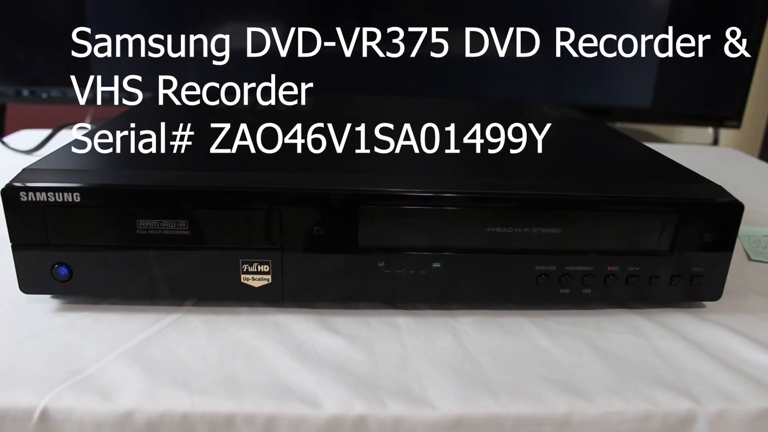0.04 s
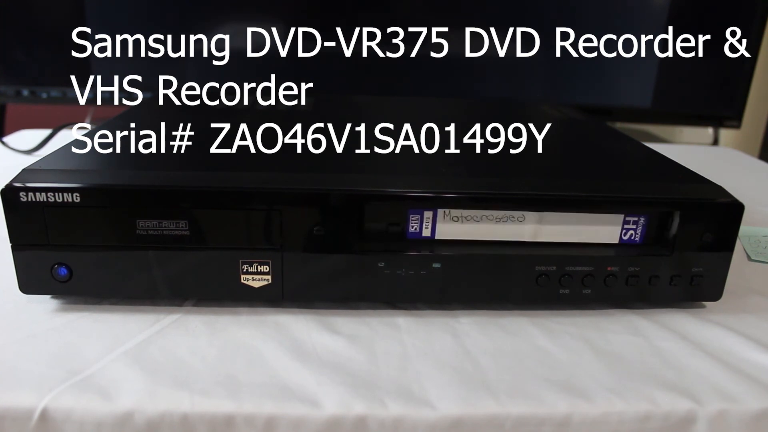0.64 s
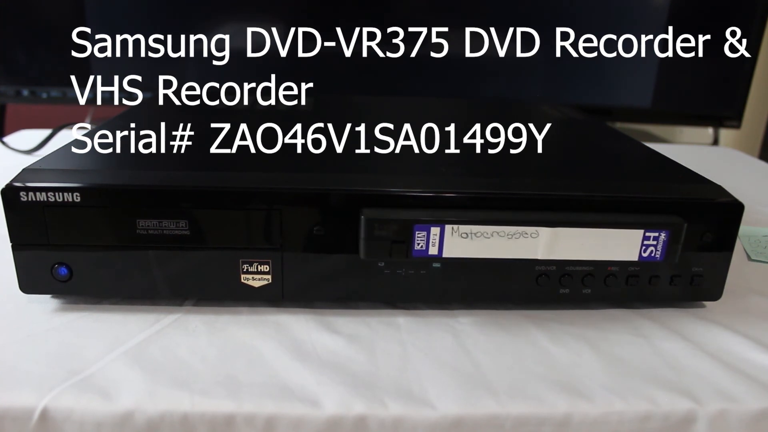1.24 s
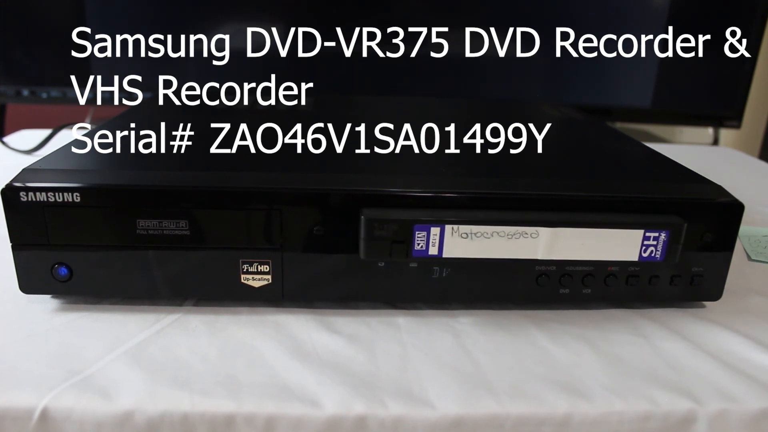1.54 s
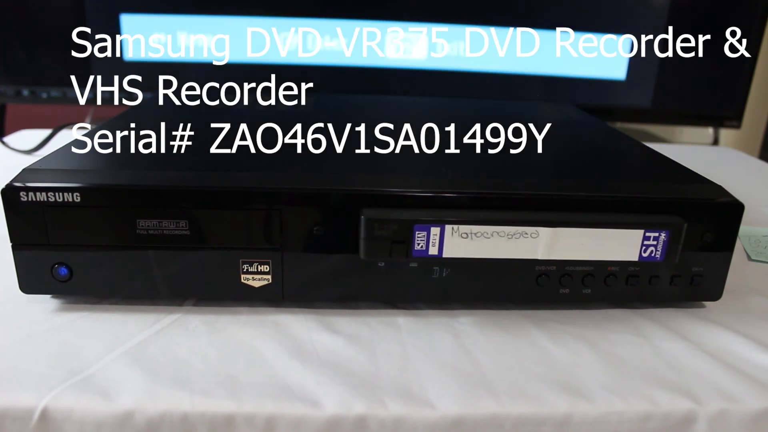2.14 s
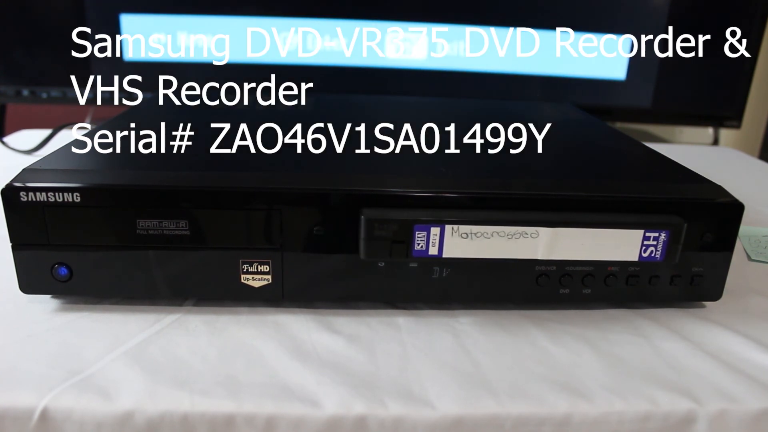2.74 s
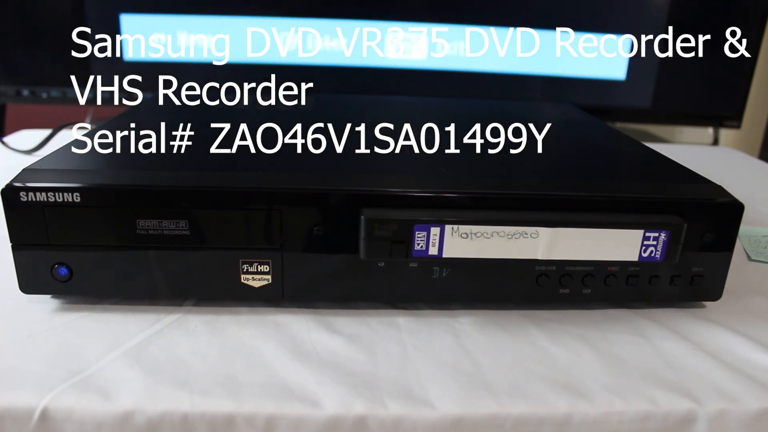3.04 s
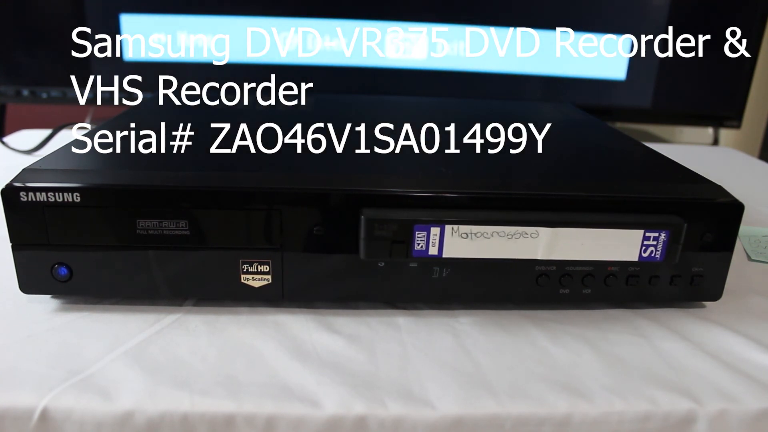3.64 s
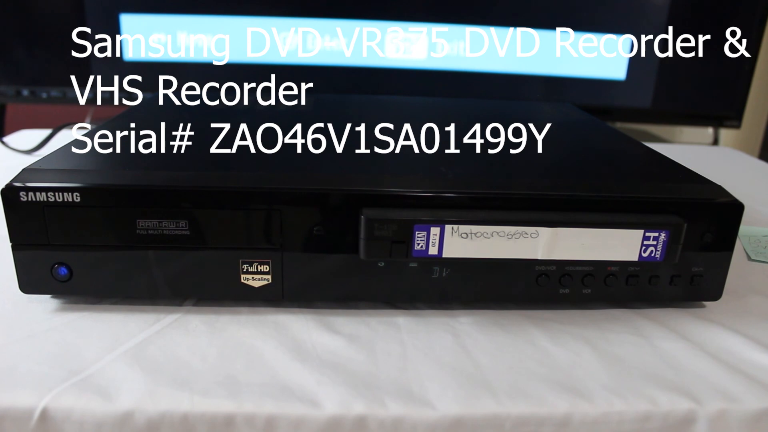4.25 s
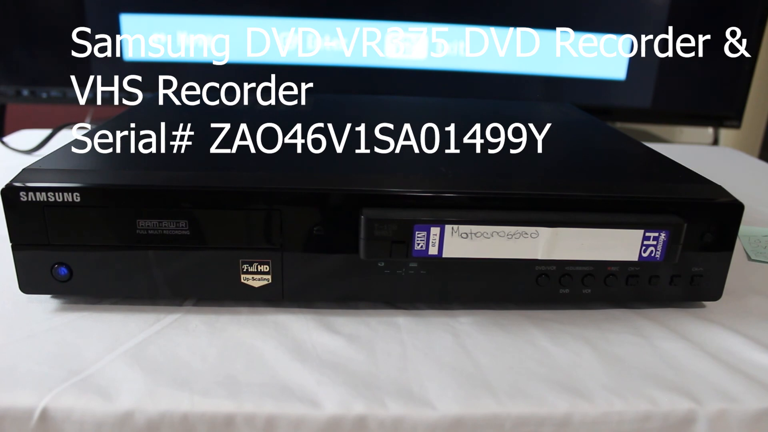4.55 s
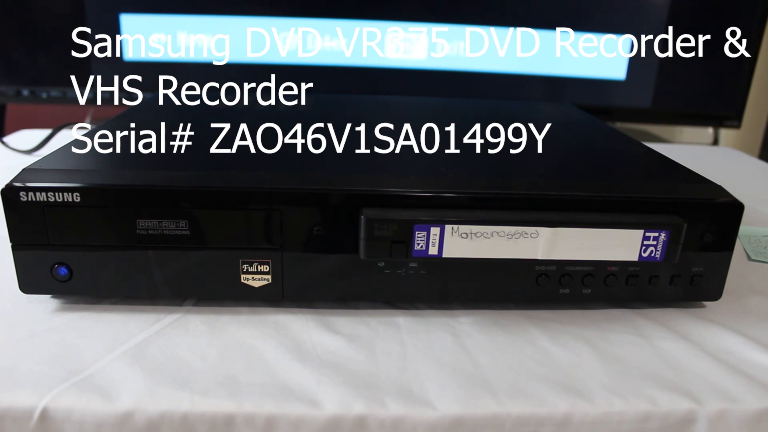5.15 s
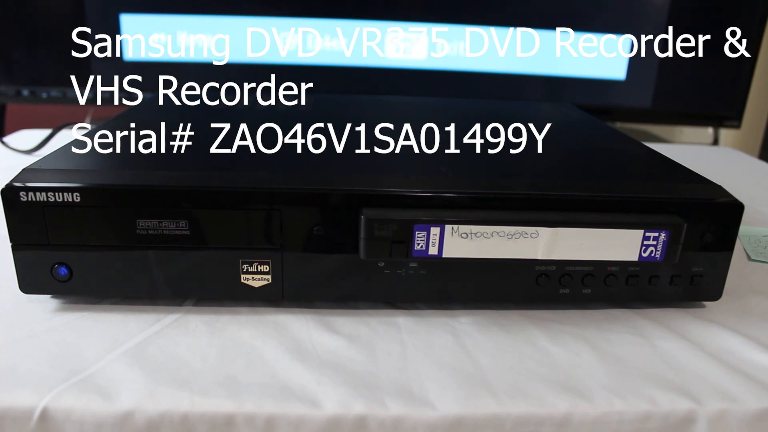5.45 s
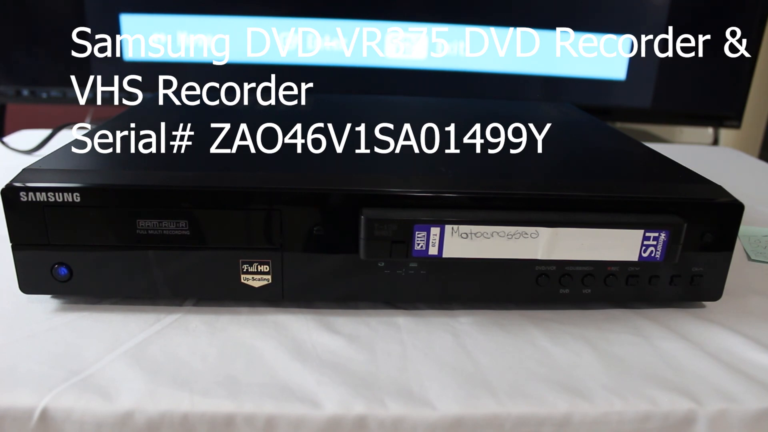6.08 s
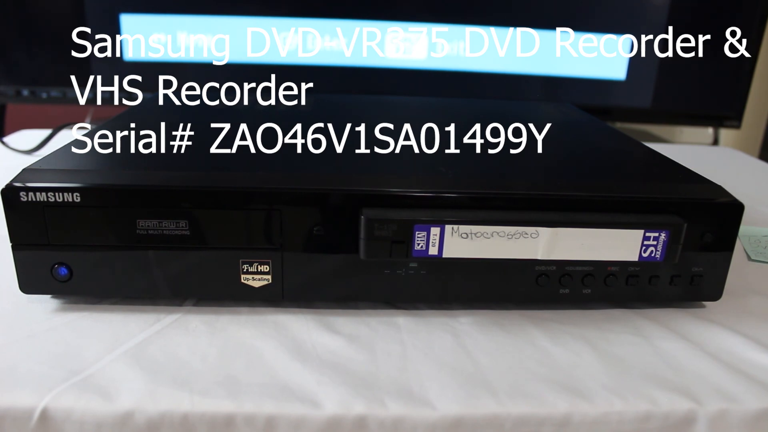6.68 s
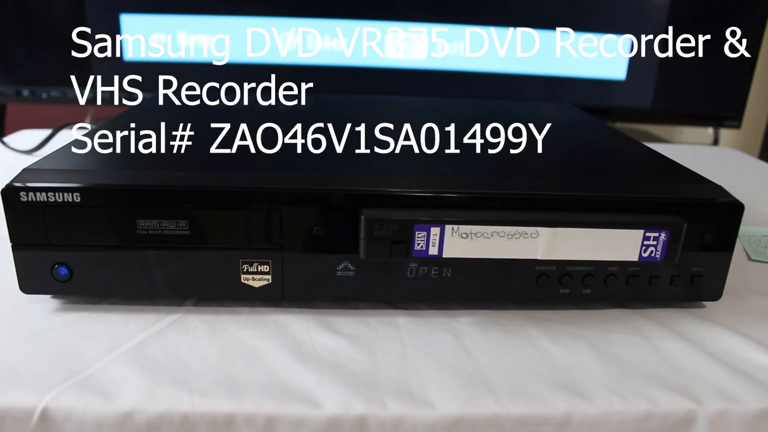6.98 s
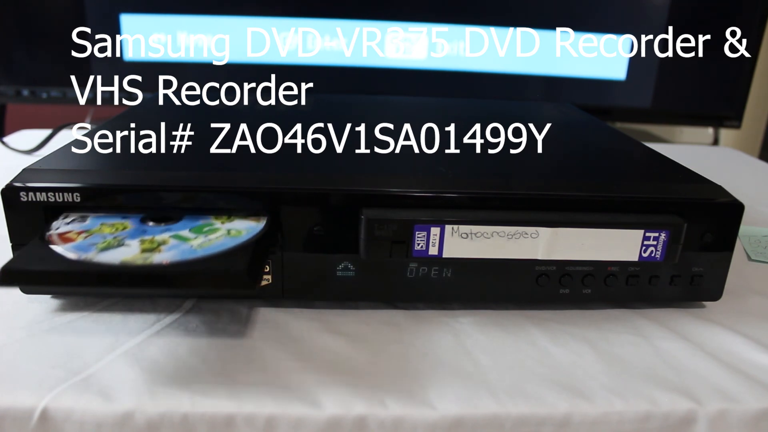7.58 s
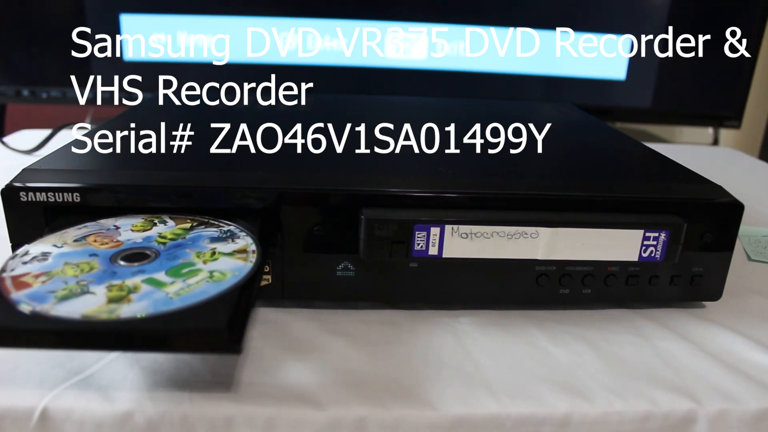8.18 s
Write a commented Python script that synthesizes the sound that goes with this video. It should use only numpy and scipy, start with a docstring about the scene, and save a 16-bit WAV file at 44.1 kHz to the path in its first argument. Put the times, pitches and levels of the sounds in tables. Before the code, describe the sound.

Close up in a quiet room, a tape and disc player ejects a cassette with chattering gears and a burst of plastic clacks. A soft whir with a thin whine runs on, then stops, and a duller rush swells and fades as a disc spins. The drive gives two short buzzes a few seconds apart. Finally a button ticks and the tray clacks loose, grinds out and knocks against its stop, over a faint hum.

```python
"""A quiet, furnished room; a stereo microphone stands close in front of a tape and disc player on a table.
The cassette carriage rattles up and drops the tape at the slot while the head drum whirs on. The drum's
whine stops; a duller rush of air swells and fades as the disc spins up. The disc drive's stepper runs its
sled out and, three seconds later, back. Then the tray unlatches, grinds out on its plastic gears and hits
its stop. The mains transformer hums throughout."""
import sys
import numpy as np
from scipy import signal
from scipy.fft import rfft, irfft, next_fast_len
from scipy.io import wavfile
from scipy.ndimage import uniform_filter1d

SR = 44100
rng = np.random.default_rng(int(sys.argv[2]) if len(sys.argv) > 2 else 0)


def pcm_store(signal):
    """Save signal as 16-bit PCM."""
    levels = np.round(np.clip(np.atleast_2d(signal), -1, 1) * 32767)
    wavfile.write(sys.argv[1], SR, levels.astype(np.int16).T)


N = 366912
TIME = np.arange(N) / SR


def undb(db):
    """Decibels to gain."""
    return 10 ** (np.asarray(db) / 20)


def unit(x):
    """Scale to rms 1."""
    return x / np.sqrt(np.mean(x ** 2) + 1e-20)


def noise(size=N):
    """White noise."""
    return rng.standard_normal(size)


def gate(start, end, rise, fall):
    """Opens at start and dies away after end; rise and fall are time constants in seconds."""
    return (1 - np.exp(-np.maximum(TIME - start, 0) / rise)) * np.exp(-np.maximum(TIME - end, 0) / fall)


def ramp(start, end, db_per_s):
    """Gain that changes at a steady rate between two times."""
    return undb(db_per_s * (np.clip(TIME, start, end) - start))


def walk(rate):
    """Smooth random drift with a spread near 1, drawn anew rate times a second."""
    step = max(int(SR / rate), 2)
    points = noise(N // step + 2)
    drift = np.interp(np.arange(N) / step, np.arange(len(points)), points)
    return 1.25 * uniform_filter1d(drift, step // 2 + 1)


def colour(x, points):
    """Minimum-phase filter through (Hz, dB) points: nothing sounds ahead of a blow."""
    size = next_fast_len(len(x) + 2048, True)
    hz, db = np.transpose(points)
    gain = undb(np.interp(np.log(np.fft.rfftfreq(4096, 1 / SR) + 1), np.log(hz), db))
    cepstrum = irfft(np.log(gain))
    cepstrum[1:2048] *= 2
    cepstrum[2049:] = 0
    impulse = irfft(np.exp(rfft(cepstrum)))
    return irfft(rfft(x, size) * rfft(impulse, size), size)[:len(x)]


def resonate(x, hz, width_hz):
    """Two-pole resonance, gain 1 at the centre."""
    return signal.lfilter(*signal.iirpeak(hz, hz / width_hz, fs=SR), x)


def steep_mode(x, hz, width_hz):
    """Two resonances in series, each twice the nominal width: one peak with steep skirts."""
    return resonate(resonate(x, hz, 2 * width_hz), hz, 2 * width_hz)


def turns(hz):
    """Cycles counted at a moving frequency, from a random phase."""
    return np.cumsum(hz * np.ones(N)) / SR + rng.random()


def tones(rows, speed, flutter_db, rate):
    """Sines that follow one shaft speed and flutter in level on their own."""
    shaft = turns(speed)
    return sum(np.sqrt(2) * undb(db + flutter_db * walk(rate)) * np.sin(2 * np.pi * hz * shaft)
               for hz, db in rows)


def teeth(hz, scatter_db, click):
    """Each gear tooth lands with a small click and slides off; scatter_db varies their loudness."""
    phase = turns(hz)
    tooth = phase.astype(int)
    force = undb(scatter_db * noise(N // 50))[tooth]
    sliding = unit(force * noise() * np.exp(-2 * (phase % 1)))
    landing = unit(force * np.diff(tooth, prepend=tooth[0]))
    return sliding + click * landing


def place(track, start, blow, db):
    """Mix a blow in at start seconds, its first 10 ms brought to db."""
    i = int(start * SR)
    track[i:i + len(blow)] += blow[:N - i] * undb(db) / np.std(blow[:SR // 100])


def pair(make, spread):
    """Diffuse sound at the microphone's two ports; spread gives side against mid as (Hz, dB) points."""
    mid, side = make(), colour(make(), spread)
    return np.array([mid + side, mid - side])


# Air and rumble all around the microphone. Each row: frequency in Hz, relative level in dB.
AIR_COLOUR = [(88, -40.5), (150, -10.5), (239, -8), (268, -7.5), (290, -11.5), (373, -11), (481, -14),
              (618, -15), (668, -16.5), (1200, -16.5), (2410, -23), (4750, -26.5), (15500, -39)]
RUMBLE_COLOUR = [(20, -26.5), (40, -21.5), (55, -16), (70, -7.5), (82, -16), (98, -4), (122, -13),
                 (145, -13), (220, -36.5), (400, -59.5)]
# The transformer, dead centre. Each row: frequency in Hz, rms level in dB.
MAINS_HUM = [(120, -53.5), (240, -64.5)]


def background(air_db=-57.0, rumble_db=-56):
    """Room air and hiss, a low rumble and the transformer's hum."""
    air = pair(lambda: unit(colour(noise(), AIR_COLOUR)), [(200, -1), (1500, 2), (4000, 3.5), (8000, 1.5)])
    rumble = pair(lambda: unit(colour(noise(), RUMBLE_COLOUR)), [(30, -13.5), (70, -8.5)])
    return undb(air_db) * air + undb(rumble_db) * rumble + tones(MAINS_HUM, 1, flutter_db=2.0, rate=5)


def room(x, wet_db=-9, low_t60=0.58, mid_t60=0.46, high_t60=0.26):
    """The walls of a small furnished room answer the player; the bass rings longest."""
    t = np.arange(int(SR * .8)) / SR
    bands = ((180, 880, low_t60, 0.62), (780, 3200, mid_t60, 0.42), (3000, 20000, high_t60, 0.51))

    def tail():
        wash = 0
        for low_hz, high_hz, t60, share in bands:
            band = signal.butter(2, (low_hz, high_hz), "band", fs=SR, output="sos")
            wash += share * signal.sosfilt(band, noise(len(t))) * undb(-60 * t / t60)
        wash *= 1 - np.exp(-t / 0.004)
        return wash / np.sqrt(np.mean(np.abs(rfft(wash)[200:2400]) ** 2))  # gain 1 over 250-3000 Hz
    response = pair(tail, [(200, -15.5), (1500, -7.5), (4000, -4), (8000, 3.5)])
    return undb(wet_db) * signal.fftconvolve(x[None], response, axes=1)[:, :N]


# The braking disc, faint inside the case. Each row: frequency in Hz, nominal width in Hz, relative dB.
SQUEAL_MODES = [(1390, 510, -8), (2110, 59, 2), (3170, 170, -6.5), (3650, 120, 0)]


def spindle(whir_db=-58, squeal_db=-58.5, scuff_hz=28, scuff_db=3):
    """The disc motor's falling whir swells and fades; later the disc scuffs once a turn as it brakes."""
    phase = 2 * np.pi * turns(np.interp(TIME, [3.9, 4.2], [625, 580]))
    whir = walk(190) * np.sin(phase) + walk(190) * np.cos(phase)  # a narrow band of noise
    swell = undb(whir_db) * np.exp(-((TIME - 4.04) / 0.16) ** 2)
    start, stop = 5.595, 5.812
    rub = noise() * undb(1.1 * walk(90) - scuff_db * np.sin(2 * np.pi * scuff_hz * (TIME - start)))
    squeal = unit(sum(undb(db) * steep_mode(rub, hz, width) for hz, width, db in SQUEAL_MODES))
    braking = undb(squeal_db) * gate(start, stop, .012, 0.013) * ramp(start, stop, db_per_s=29)
    return whir * swell + squeal * braking


DRUM_OFF_S = 3.11
# The rush of stirred air and the drum motor's whine, heard through the case.
# Each row: frequency in Hz, relative level in dB.
RUSH_COLOUR = [(120, -49), (200, -7.5), (231, -3), (267, -17), (405, 2), (459, -8), (540, -5), (696, -10.5),
               (1430, -6.5), (1980, -13.5), (3540, -11), (4470, -29.5), (6300, -21), (7150, -23.5),
               (15000, -35)]
DRUM_WHINE = [(398.4, -71), (2471, -71.5), (3738, -77), (5410, -80), (5475, -80), (6142, -89), (6207, -74),
              (6277, -80), (6342, -80), (6412, -76), (7747, -89.5), (7876, -77), (8479, -73), (8613, -91),
              (9615, -88), (10880, -79.5), (11348, -85), (11816, -89)]


def drum_and_disc_air(drum_db=-54, spin_up_db=-48.5, whine_db=-1, spin_up_end_s=4.08):
    """The head drum's whir and whine stop; a duller rush of air swells and fades as the disc spins up."""
    air = unit(colour(noise() * undb(1.6 * walk(60)), RUSH_COLOUR))
    dull_air = colour(air, [(1200, -3.0), (3500, -5.0), (6000, -8)])
    powered = gate(-1, DRUM_OFF_S, .01, 0.026)
    running = undb(drum_db) * powered * ramp(0, DRUM_OFF_S, db_per_s=-1.06)
    spin_up = undb(spin_up_db) * gate(DRUM_OFF_S, spin_up_end_s, 0.065, 0.3)
    spin_up *= ramp(DRUM_OFF_S, spin_up_end_s, db_per_s=-9)
    speed = 1 + 0.00033 * walk(5) + .001 * walk(70)
    whine = tones(DRUM_WHINE, speed, flutter_db=1.5, rate=13)
    return air * running + dull_air * spin_up + undb(whine_db) * whine * powered


# A button, close to the microphone. Each row: start in seconds, level in dB.
BUTTON_TICKS = [(1.5662, -46.5), (6.8403, -41)]


def button(t60=0.047):
    """A button gives a short dry tick, narrow and bright."""
    out, t = np.zeros(N), np.arange(SR // 8) / SR
    shape = [(700, -16), (2000, -14), (3000, -4.5), (4100, -6.0), (4900, -35), (10000, -44)]
    for start, db in BUTTON_TICKS:
        place(out, start, colour(noise(len(t)) * undb(-60 * t / t60), shape), db)
    return out


# The sled's two runs inside the disc drive. Each row: start and end in seconds, base levels of tone
# and rattle in dB, settling time in seconds, base level of the jolts in dB.
SLED_RUNS = [(3.355, 3.505, -43, -44.5, 0.02, -44.5), (6.398, 6.567, -41.5, -47.5, 0.056, -41)]
# The stepper's note going out and coming back. Each row: multiple of the step rate, relative level in dB.
HARMONICS_OUT = [(1, -2), (2, 2.5), (3, -2.5), (4, -3), (5, -3), (6, -8), (7, -13), (8, -2.5), (9, -6.5),
                 (10, -8), (12, -22), (14, -17), (15, -9), (18, -21), (19, -25)]
HARMONICS_BACK = [(1, -0.5), (2, -4), (3, -2), (4, -4), (5, 1.5), (6, -8), (7, -41), (8, -1), (9, -8),
                  (10, -12), (11, -26), (12, -25), (13, -22), (14, -14), (15, -6.5), (16, -23), (17, -14),
                  (18, -13), (19, -30), (20, -19), (21, -18), (22, -28), (23, -29), (24, -15), (25, -25),
                  (26, -29), (27, -33)]
# The lead screw's rattle. Each row: frequency in Hz, relative level in dB.
SCREW_COLOUR = [(150, -3), (250, -33), (362, -19), (621, -12), (760, -2), (930, -9), (1100, -1.5),
                (1760, -3), (1920, -19), (2020, -5), (3070, -3), (4930, -19), (5540, -15), (7020, -12),
                (9800, -17.5), (11500, -30), (14000, -37)]


def sled(step_hz=381.8, rough_db=7):
    """The stepper rattles its lead screw, locks to the step rate and sings, then rattles as it stops."""
    out = 0
    for run, harmonics in zip(SLED_RUNS, (HARMONICS_OUT, HARMONICS_BACK)):
        start, end, tone_db, rattle_db, settle, _ = run
        locked = np.interp(TIME, [start + settle / 2, start + settle, end - .022, end], [.2, .96, .97, .22])
        hz = step_hz * (1 + (.002 + .03 * (1 - locked)) * walk(300))
        phase = 2 * np.pi * turns(hz)
        tone = unit(sum(undb(db) * np.sin(k * phase + 2 * np.pi * rng.random()) for k, db in harmonics))
        rattle = unit(colour(teeth(hz, scatter_db=0.0, click=0.35), SCREW_COLOUR))
        rattle *= undb(rattle_db + rough_db * (.8 - locked) / 2)
        out += gate(start, end, 0.0012, 0.0055) * (undb(tone_db) * locked * tone + rattle)
    return out


def shudders(frame_hz=372, frame_lag_s=0.017, rattle_db=-3, jolt_s=.036, brake_lead_s=0.017):
    """Jolts shake the drive's loose parts at once and rock its frame at its resonance a moment later."""
    shake = teeth(190 * (1 + .2 * walk(80)), scatter_db=-0.5, click=0.075)
    frame = unit(resonate(resonate(shake, frame_hz, 60), frame_hz, 81))
    rattle = unit(colour(shake, [(100, 0), (200, 8.5), (700, -1.5), (1400, 5.0), (2300, -5.5),
                                 (3500, -4.5), (4600, -20.0), (7000, -18), (12000, -35)]))
    jolts = [(DRUM_OFF_S - brake_lead_s, -45)]  # seconds and dB: the drum's drive is cut
    for start, end, *_, db in SLED_RUNS:
        twitch, brake, rebound = (start - 0.074, db - 4.5), (end - brake_lead_s, db - .5), (end + .041, db - 5)
        jolts += [twitch, (start, db), brake, rebound]
    push = sum(undb(db) * gate(at, at + jolt_s, 0.0089, 0.013) for at, db in jolts)
    return undb(rattle_db) * rattle * push + frame * np.interp(TIME - frame_lag_s, TIME, push)


# The loading gears behind the cassette slot. Each row: frequency in Hz, relative level in dB.
LOADER_COLOUR = [(59, -52), (100, -9), (171, -11), (238, 1), (416, -5.5), (491, -5.5), (617, -3),
                 (993, -11.5), (1630, -9), (2220, -20), (2570, -8), (5520, -25), (14000, -48)]


def loader(tooth_hz=190, motor_db=-61, slide_db=-46.5, lift_db=-50):
    """Worm gear and racks chatter with the load: bare motor, sliding carriage, ever heavier lift."""
    mesh = teeth(tooth_hz * (1 + .15 * walk(80)), scatter_db=2.0, click=0.24)
    chatter = unit(colour(mesh * undb(2 * walk(53.84)), LOADER_COLOUR))
    motor = undb(motor_db) * gate(-1, 1.4, .01, 0.16)
    slide = undb(slide_db) * gate(0.27, 0.99, 0.11, 0.054)
    lift = undb(lift_db) * gate(0.37, 0.641, .01, 0.039) * ramp(0.37, 0.641, db_per_s=65)
    return chatter * (motor + slide + lift)


# Grind and whine of the tray's gears, close in front. Each row: frequency in Hz, relative level in dB.
GRIND_COLOUR = [(100, -33), (170, -3.5), (414, -0.5), (461, -2), (670, -2.5), (786, -5), (974, -4.5),
                (1100, 4.5), (1320, -2), (1660, -2.5), (2330, -8), (3450, -16), (4670, -22), (5680, -21),
                (12000, -38.5), (15600, -61), (22000, -120)]
GEAR_WHINE = [(360.7, -19), (409.1, -17), (802.1, -12.5), (1130, -19), (1663, -15)]
# The gear train's resonances. Each row: frequency in Hz, nominal width in Hz, relative level in dB.
GEAR_MODES = [(1130, 37, -18), (1700, 28, 0.5), (2820, 120, 1.5), (2980, 72, 2), (3410, 170, 1),
              (4040, 92, -4.5), (5730, 170, -13)]


def tray_gears(tooth_hz=268.5, wheel_hz=18, grind_db=-2.0, modes_db=-5, travel_db=-44.5, clamp_db=-45.5):
    """Plastic gears grind, ring and whine, throbbing once per turn of an off-centre wheel."""
    speed = 1 + .004 * walk(9) + .008 * walk(90)
    wheel = turns(wheel_hz * (1 + .1 * walk(4)))
    throb = undb(1.5 * np.sin(2 * np.pi * wheel) + .8 * walk(50))
    mesh = teeth(tooth_hz * speed * (1 + .06 * walk(200)), scatter_db=2.1, click=.15)
    grind = unit(colour(mesh, GRIND_COLOUR))
    # each resonance flutters as the load shifts between the gears
    ringing = unit(sum(undb(db + 2.6 * walk(45)) * steep_mode(mesh, hz, width)
                       for hz, width, db in GEAR_MODES))
    whine = tones(GEAR_WHINE, speed, flutter_db=1.5, rate=25)
    load = undb(travel_db) * gate(6.855, 8.08, 0.097, 0.038)
    load += undb(clamp_db) * gate(6.925, 7.1, 0.0079, 0.028)  # heavier while it frees the disc clamp
    return (undb(grind_db) * grind + undb(modes_db) * ringing + whine) * throb * load


def knocks(rows, shape, modes, ring_db, snap_db, snap_share,
           strike_db, strike_t60, crack_t60, case_db, case_t60, case_slope):
    """Each blow is a sharp strike, a dense plastic crack, a wash inside the case and the part's modes."""
    out, t = np.zeros(N), np.arange(SR // 2) / SR
    typical_db = np.mean([row[1] for row in rows])
    for start, db, bass, treble in rows:
        wash_db = case_db - case_slope * (db - typical_db)  # heavy blows are the driest
        strike = undb(strike_db - 60 * t / strike_t60)
        fade = strike + undb(-60 * t / crack_t60) + undb(wash_db - 60 * t / case_t60)
        crack = colour(noise(len(t)) * fade * (1 - np.exp(-t / 0.0002)), shape)
        ring = sum(undb(mode_db - 60 * t / t60) * np.sin(2 * np.pi * hz * t) * rng.choice([-1, 1])
                   for hz, mode_db, t60 in modes)
        # soft heavy contacts favour the bass, hard light ones the treble and the snap above it
        snap = snap_db + snap_share * treble
        contact = [(130, bass / 2 - 4), (330, bass), (580, bass), (1350, 0), (3800, 0),
                   (6000, treble), (8500, treble), (12000, snap), (15000, snap + 4)]
        place(out, start, colour(unit(crack) + undb(ring_db) * unit(ring), contact), db)
    return out


# The sled's starts and stop (first three rows), then clamp, latch and tray, close in front.
# Each row: start in seconds, level in dB, bass and treble in dB against the middle.
DRIVE_BLOWS = [(3.365, -45, -1, 10), (6.411, -40, -8, 9), (6.549, -42.5, -7, -10), (6.927, -36.5, -9, -12),
               (6.94, -35, -8, -4), (6.967, -32.5, -5, -2.5), (7.045, -31.5, -2.5, -11),
               (7.074, -34, 0, -7), (7.115, -17.5, -16, -8), (7.143, -30, -4, -17), (8.023, -35, 3, -1),
               (8.031, -24, -6.5, -7.5), (8.047, -32, 2, 0), (8.07, -37, 3, -6)]
# The crack of the disc drive's plastic. Each row: frequency in Hz, relative level in dB.
DRIVE_COLOUR = [(35, -46), (60, -8), (385, 4.5), (475, -1), (738, -12.5), (810, -5.5), (999, -8.5),
                (1200, -1.5), (1830, -9.5), (2250, -6), (2650, -10.5), (3420, -6), (4520, -16.5),
                (8470, -19.5), (15500, -37)]
# The tray's ring. Each row: frequency in Hz, relative level in dB, seconds to fall 60 dB.
TRAY_MODES = [(264, -16, 0.18), (350, 1, 0.29), (398, 17, 0.32), (598, 6, 0.3), (802, -67, .15),
              (948, 4, 0.26), (1180, -8, 0.11), (1260, -14, .12), (1660, -2, 0.26), (2113, 1.5, 0.14),
              (2449, -25, .17), (3240, -24, 0.18), (3530, -25, .2), (3970, 3, 0.058)]


def drive_knocks():
    """The sled knocks as it starts and brakes; then clamp and latch knock and the tray hits its stop."""
    return knocks(DRIVE_BLOWS, DRIVE_COLOUR, TRAY_MODES, ring_db=-5, snap_db=-9, snap_share=0.95,
                  strike_db=-6, strike_t60=0.043, crack_t60=0.043,
                  case_db=-6, case_t60=0.17, case_slope=1.0)


# Cassette carriage and flap, close and just right of centre.
# Each row: start in seconds, level in dB, bass and treble in dB against the middle.
CARRIAGE_BLOWS = [(0.29, -44.5, 8, -16), (0.36, -36.5, 11, -2), (0.374, -39, -10, 1),
                  (0.408, -39.5, -11, -2), (0.445, -29, -5, -5.5), (0.49, -30, 8, -3), (0.508, -46, -4, -6),
                  (0.525, -31, -4, -3), (0.544, -34, 2, -2), (0.601, -23, -10, -3.5),
                  (0.623, -17.5, -14, -3.5), (0.63, -22, -6, -17), (0.866, -34, 2, -6.5),
                  (1.001, -32, 0, 5.5), (1.013, -38, 5, -1), (1.016, -24.5, 5.5, -24), (1.3, -49, 8, -8),
                  (2.952, -51, 4, -3)]
# The crack of the carriage's plastic. Each row: frequency in Hz, relative level in dB.
CARRIAGE_COLOUR = [(35, -50), (60, -19), (112, -2), (201, -9), (242, -14.5), (521, -2.5), (599, 3),
                   (673, -10.5), (829, 5.5), (1050, -8.5), (1630, -3.5), (2470, -6.5), (7200, -14),
                   (13800, -39.5), (15500, -61)]
# The tape deck's chassis. Each row: frequency in Hz, relative level in dB, seconds to fall 60 dB.
CHASSIS_MODES = [(261, -3, 0.25), (320, 1.5, 0.24), (361.5, 4, 0.2), (413, -1.5, 0.22), (438, 2, 0.21),
                 (556.5, -3, 0.29), (610, -3, 0.23), (733, -3, 0.16), (816, 2, 0.12), (1127, 1.5, 0.13),
                 (1314, -5, 0.19), (1635, 3.5, 0.089), (2060, -20, 0.1), (2000, 1, 0.13), (2430, -7, .11),
                 (2476, -8, .13), (2920, -4, 0.15), (3700, -2.5, 0.052), (3980, -3.5, 0.085)]


def carriage_knocks():
    """The cassette carriage and flap clatter and set the chassis ringing."""
    return knocks(CARRIAGE_BLOWS, CARRIAGE_COLOUR, CHASSIS_MODES, ring_db=-2.5, snap_db=1.5,
                  snap_share=1.7, strike_db=-2, strike_t60=0.034, crack_t60=0.053,
                  case_db=-16, case_t60=0.38, case_slope=0.28)


def scene(tape_right_db=1.1):
    """All parts sound from the one case; the tape deck sits to the right of the disc drive."""
    right, centre = carriage_knocks(), drive_knocks()
    right += loader() + drum_and_disc_air()
    centre += button() + sled() + shudders() + spindle() + tray_gears()
    direct = right * undb([[-tape_right_db / 2], [tape_right_db / 2]]) + centre
    return direct + room(right + centre) + background()


# The stereo microphone's two ports. Each row: frequency in Hz, left minus right in dB.
PORT_BALANCE = [(100, -1), (300, -0.7), (600, -1), (1100, -2), (2200, -1), (4500, 0.9), (8000, 0.5),
                (13000, 0)]


def record(dry, port_hz=8700, port_width_hz=1700, lift=0.15, top_hz=15750):
    """The microphone's ports differ a little in colour and resonate in the treble; the top is cut."""
    left, right = (colour(x, [(hz, sign * db / 2) for hz, db in PORT_BALANCE])
                   for x, sign in zip(dry, (1, -1)))
    # the right port's phase turns over around its resonance
    ports = np.array([left, right - 2 * resonate(right, port_hz, port_width_hz)])
    ports += lift * resonate(ports, port_hz, 2 * port_width_hz)
    return signal.sosfilt(signal.ellip(10, .2, 70, top_hz, fs=SR, output="sos"), ports)


dry = scene()
out = record(dry)
pcm_store(out)
```